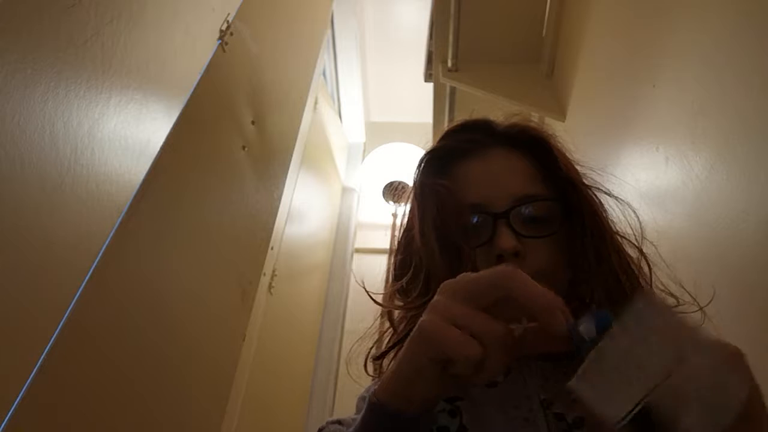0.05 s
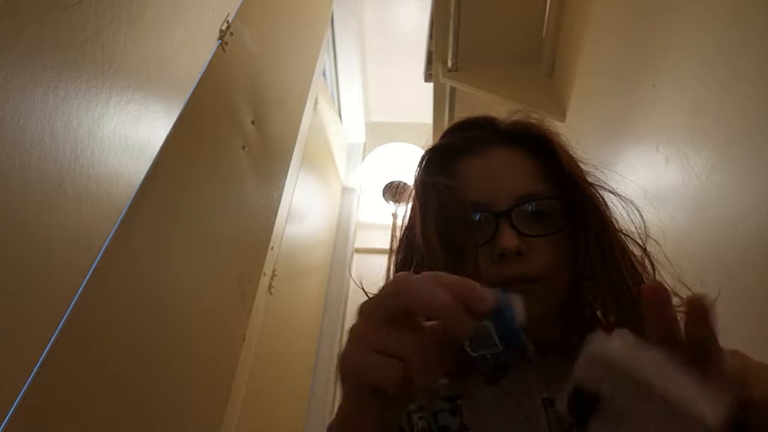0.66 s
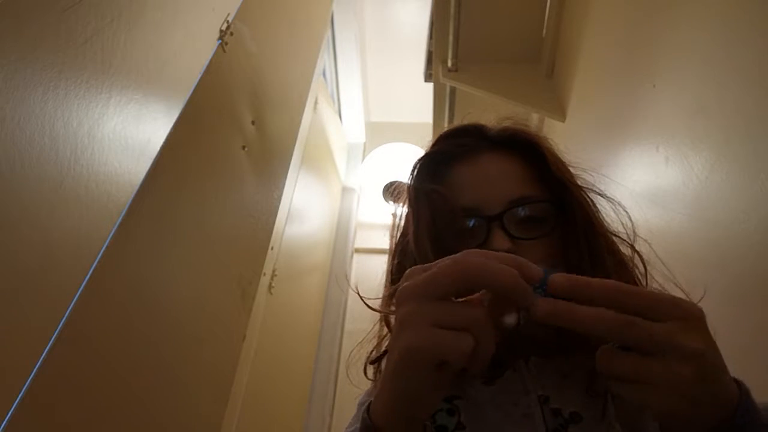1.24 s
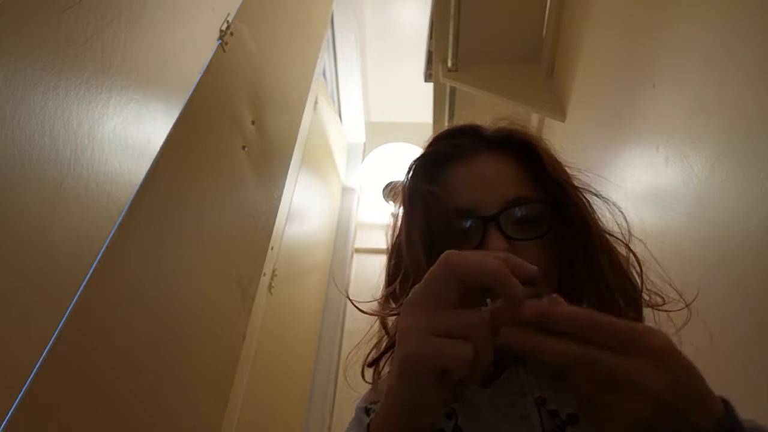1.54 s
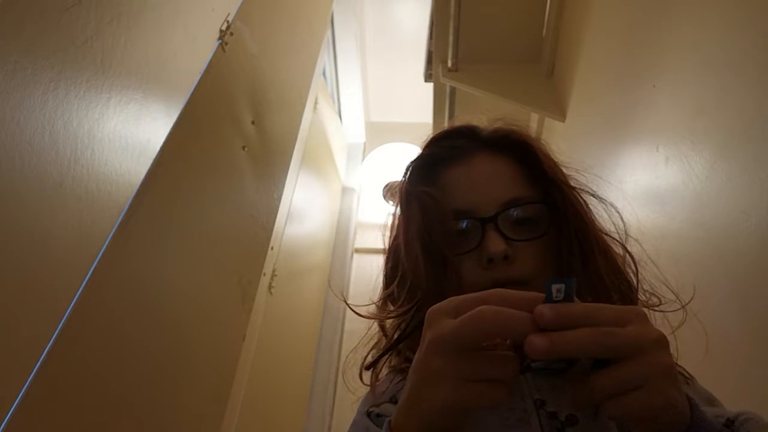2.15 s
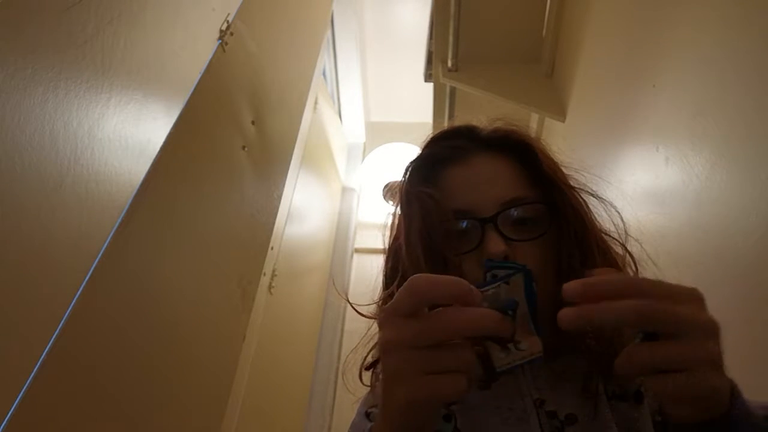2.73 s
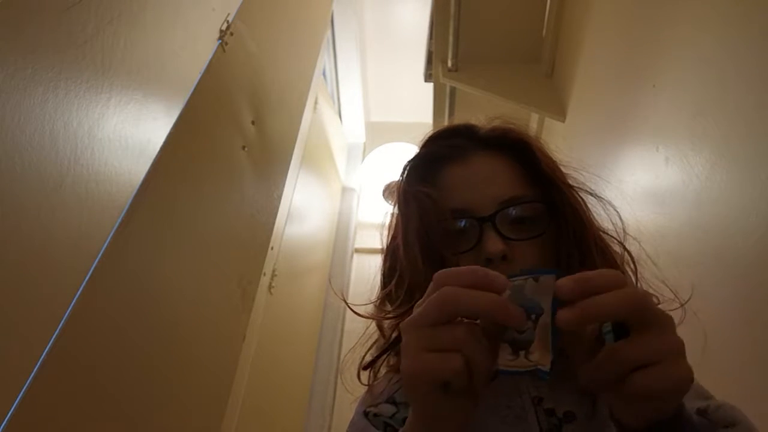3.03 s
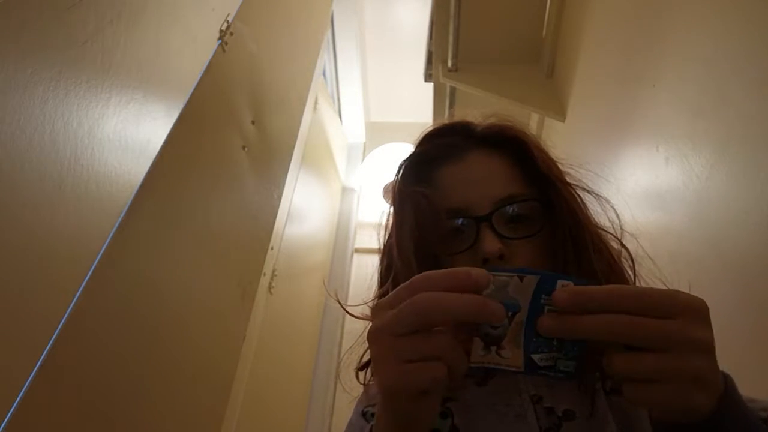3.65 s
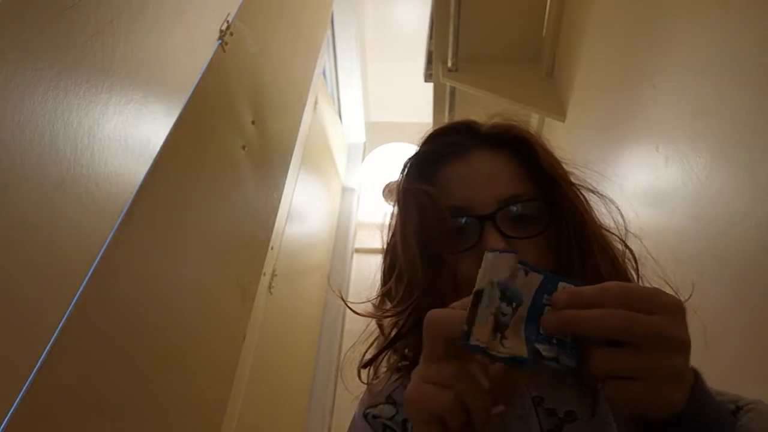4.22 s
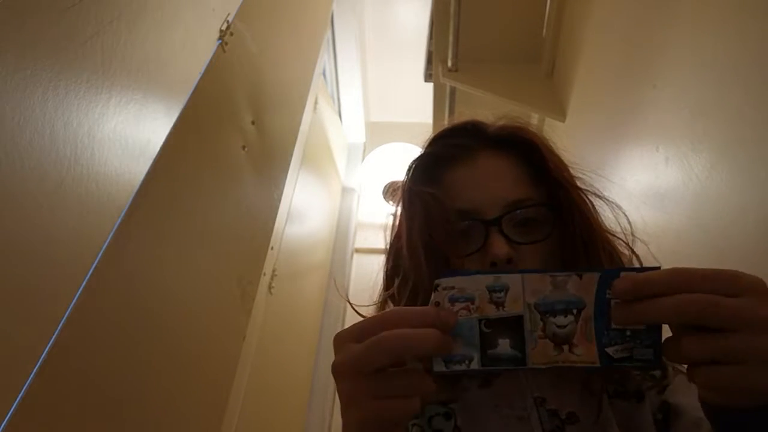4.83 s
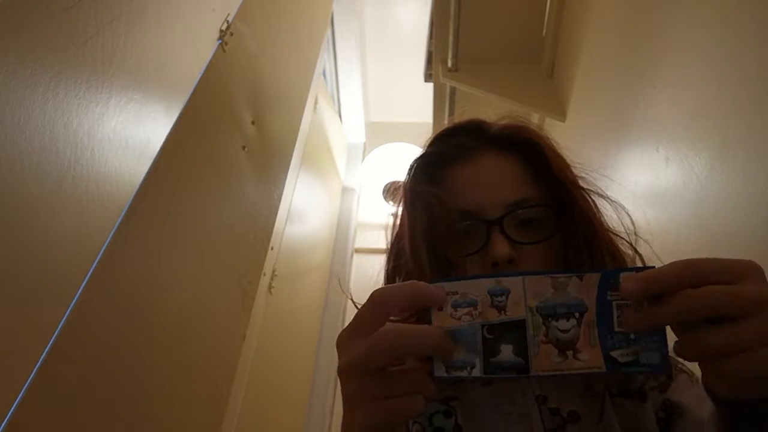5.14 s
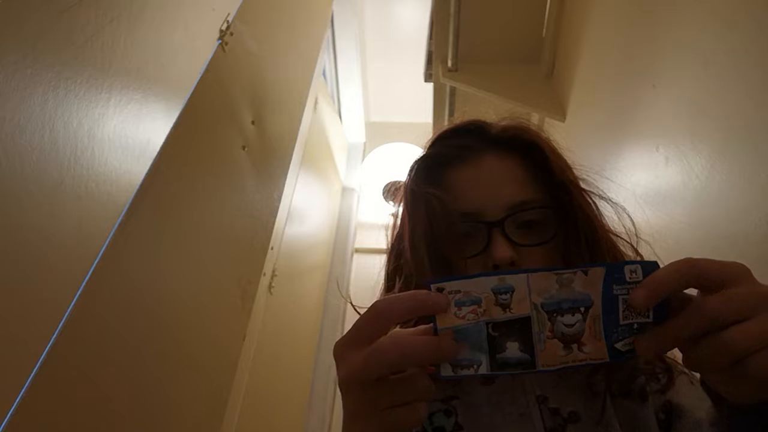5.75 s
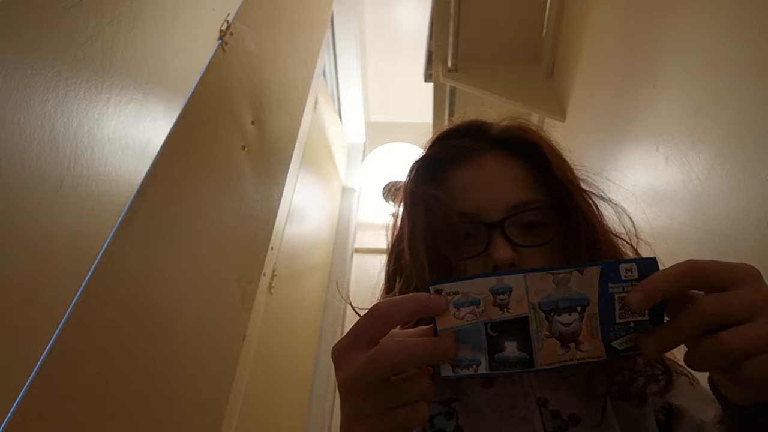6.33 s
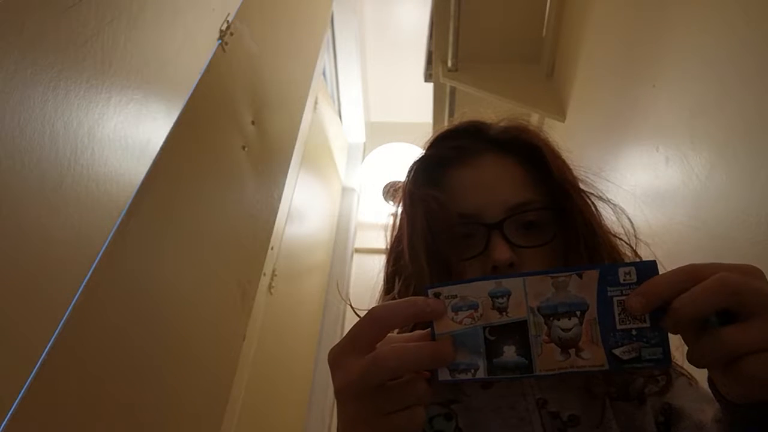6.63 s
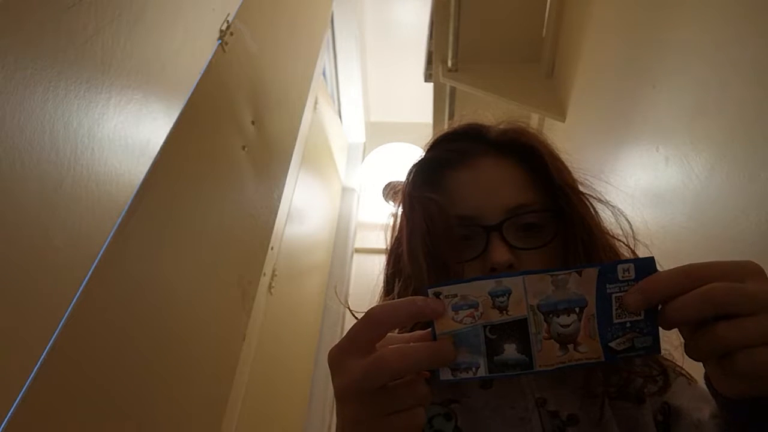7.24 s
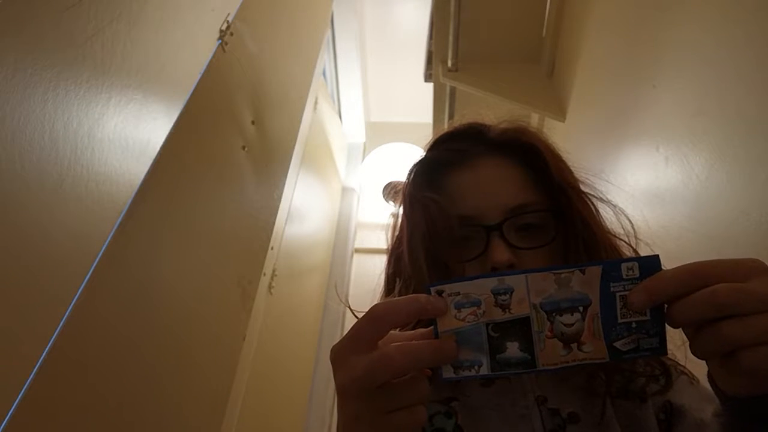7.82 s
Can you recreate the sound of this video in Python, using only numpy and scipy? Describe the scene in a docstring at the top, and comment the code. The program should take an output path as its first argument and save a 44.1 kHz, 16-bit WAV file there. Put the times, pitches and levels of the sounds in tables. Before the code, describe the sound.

A little paper leaflet is unfolded by hand, close up and fairly quietly. It rustles at first, then fingertips slide gently over it with occasional clicks from the creases. Midway comes a flurry of crackles, a quick judder and a sharp snap, with soft puffs of air. Afterwards the open sheet stirs only now and then. Bare hallway walls add a short echo over a faint wavering hum.

```python
"""Unfolding a paper leaflet

A small folded leaflet is picked out, pried open and pulled flat close to a microphone in a narrow
hallway. Creases buckle with sharp snaps, layers and fingertips slide with stick-slip friction, and
the opening sheet flaps, judders and fans the air. Bare walls reflect every snap; under it all lie
a low rumble, a faint hiss, a passing hum and a far whine."""
import sys
import numpy as np
from scipy import signal
from scipy.fft import rfft, irfft, next_fast_len
from scipy.io import wavfile
from scipy.ndimage import map_coordinates

SR = 44100
rng = np.random.default_rng(int(sys.argv[2]) if len(sys.argv) > 2 else 0)


def generate_wav(signal):
    """Clip the signal to [-1, 1] and save it as 16-bit WAV at the path in sys.argv[1]."""
    frames = np.transpose(np.atleast_2d(signal))
    scaled = np.clip(frames, -1, 1) * 32767
    pcm = np.round(scaled).astype(np.int16)
    wavfile.write(sys.argv[1], SR, pcm)


N = 351785

# buckling creases: t/s, level/dB, panel f/Hz, sharpness/dB, relative sheet flex/dB, panel T60/s
SNAPS = [(.0727, -31.5, 2850, -2, -19, .01), (.1615, -48.5, 2260, 2.5, -9, 0.011),
         (.3612, -66.5, 1980, -18, -14, .018), (.4866, -66, 2700, 10, -1, .02),
         (.6587, -47, 2100, -13, -4.5, .02), (.7366, -45, 2300, -0.5, -12, 0.0082),
         (.9674, -35, 2040, -8, -9, 0.022), (1.0097, -45, 1960, -22, -5, 0.041),
         (1.179, -39, 1970, -0.5, -5, .03), (1.953, -77, 2300, 6, -15, .01),
         (2.099, -42.5, 2207, -3, -28, 0.019), (2.317, -66.5, 2010, 9, -6, .012),
         (2.4442, -61.5, 1980, 7.5, -20, .01), (2.5633, -40.5, 2070, 2, -12, 0.01),
         (2.6607, -57.5, 1720, -7, 6, 0.0064), (3.1936, -53, 2170, -3, -4.5, 0.013),
         (3.3357, -51, 2000, -21.5, -8, .015), (3.3621, -47.5, 2310, -10, -5, 0.0066),
         (3.4586, -58, 2150, 4, -0.5, 0.017), (3.7258, -35, 2140, -10.5, -16, 0.011),
         (3.7897, -56, 2160, -5, -17, 0.014), (3.8317, -55.5, 2020, -7, -10, 0.014),
         (3.8733, -48, 2050, -6, -7, 0.018), (3.879, -53, 2180, 3, -20, .013),
         (3.918, -36.5, 2000, -3.5, -11, 0.014), (3.9504, -40, 2060, -6, -5, 0.01),
         (3.96, -35, 2210, 7.5, -16, 0.0048), (3.9844, -45, 2280, -9, -12, 0.0081),
         (4.03, -50.5, 2360, 6.5, -7, .012), (4.0751, -48, 2110, 4.5, -9, .011),
         (4.0904, -56, 2240, 7.5, -18, 0.013), (4.1336, -48, 1960, 0, -4.5, 0.021),
         (4.2072, -50, 2450, -1.5, -6, 0.011), (4.248, -55, 2390, -8, -25, .017),
         (4.356, -41.5, 2370, 0.5, -8.5, 0.0061), (4.3655, -51, 2280, -5, -3, .012),
         (4.3957, -43, 2310, 2, -22, .013), (4.4027, -40, 2030, 3, -3, 0.0038),
         (4.4182, -44, 2700, 5.5, -24, 0.0087), (4.4261, -37.5, 2600, 5, -6, 0.0037),
         (4.5991, -47, 2100, -18, 2.5, 0.012), (4.612, -37, 1940, -10, -4, 0.0097),
         (5.133, -57, 1780, 3, -1, 0.013), (5.1596, -32.5, 2400, -7, -35, 0.0085),
         (5.2039, -42.5, 2210, -2.5, -21, 0.0037), (5.3344, -60, 2460, 0.5, -9, 0.012),
         (5.3911, -62.5, 2120, 5, -25, 0.0095), (5.7846, -55, 2000, -6, -5.5, .012),
         (6.128, -69.5, 2200, -0.5, -6, 0.0092), (6.2958, -61, 2010, -5.5, -9, 0.0091),
         (6.4287, -61.5, 1840, -8, -2.5, 0.013), (6.5164, -68, 1690, -6, 6.5, 0.014),
         (6.6243, -52.5, 2340, -9, -4, 0.0042), (6.8, -68, 2200, -10, -5, .01),
         (7.136, -42, 2350, -30, -11, 0.0038), (7.2173, -47.5, 2070, -23, -5.5, 0.0073),
         (7.7428, -57.5, 2610, -22, 0.5, .02), (7.768, -64, 2360, 2, 6, 0.01)]
# bending modes of a panel: ratio to the panel frequency, relative level/dB
PANEL_MODES = [(.9, -14.5), (0.997, 2.5), (1.121, -3)]
# where the paper is held: t/s, left minus right level/dB
PAPER_PAN = [(0, -2.5), (1.1, -4), (2.1, -0.5), (3.3, 1), (3.72, -2), (4.4, -3.5), (4.6, -1.5), (7.98, 0)]
# strokes of paper on paper and skin: fastest at t/s, rise/s, fall/s, hiss level/dB, scrape level/dB
STROKES = [(0.094, 0.032, 0.078, -44.5, -44.5), (0.168, 0.022, .05, -50, -53),
           (.417, 0.027, 0.11, -57, -64.5), (.62, .1, 0.11, -44.5, -53.5), (.662, 0.056, 0.097, -62, -48.5),
           (0.769, 0.054, 0.041, -49, -55.5), (1.005, 0.066, 0.091, -56.5, -53.5),
           (1.124, 0.049, 0.081, -57.5, -76), (1.22, 0.075, 0.1, -58, -74),
           (1.655, 0.024, 0.079, -61.5, -62.5), (1.853, 0.044, .075, -50, -62.5),
           (2.12, 0.02, 0.1, -57.5, -72), (2.23, 0.092, 0.057, -54.5, -63.5), (2.41, .05, .05, -67, -72),
           (2.46, .02, .08, -60.5, -83), (2.585, .025, 0.2, -57.5, -59), (3.136, 0.027, 0.11, -54.5, -80),
           (3.205, 0.038, .12, -68, -61.5), (3.365, 0.056, 0.1, -60, -57.5), (3.49, 0.065, .12, -54, -57.5),
           (3.7, 0.6, .25, -92, -66.5), (3.97, 0.085, .13, -50, -55), (4.035, 0.076, 0.14, -62, -52),
           (4.14, 0.03, 0.073, -55.5, -59), (4.297, .06, .08, -51.5, -50.5), (4.4, 0.093, .07, -46, -47),
           (4.439, 0.069, 0.072, -54, -47), (4.644, 0.047, 0.072, -61.5, -48),
           (4.82, 0.096, 0.15, -69, -56), (4.98, 0.055, 0.081, -57.5, -60.5),
           (5.142, 0.029, 0.056, -48, -50.5), (5.197, .04, 0.07, -54.5, -48), (5.472, 0.057, .07, -61, -63),
           (6.0, 0.19, 0.32, -92, -70.5), (6.61, 0.19, 0.11, -73.5, -80), (7.78, 0.039, 0.083, -60, -60.5)]
# fingertips never quite at rest on the paper: t/s, hiss level/dB
GRIP = [(0, -68.5), (.3, -84.5), (1.1, -78), (1.6, -74), (1.97, -78), (2.4, -78), (2.95, -82), (3.8, -75),
        (5.1, -84), (5.6, -85), (7.98, -85.5)]
# spectra of the bright and the dull part of friction noise: f/Hz, relative level/dB
HISS_SPECTRUM = [(1800, -12), (3000, 2.5), (3700, 3), (4700, 1), (7000, 4.5), (8500, -1), (10500, 2.5),
                 (13000, -3.5), (15500, -13.5)]
SCRAPE_SPECTRUM = [(200, 1.5), (450, 3), (750, -6), (1250, -3.5), (1600, 0), (2100, 7), (2800, 5.5),
                   (4200, -29)]
# sheet flaps and finger bumps: t/s, thud level/dB, thud f/Hz, knock level/dB, knock f/Hz
FLAPS = [(.093, -51.5, 216, -60.5, 363), (.421, -60, 119, -57, 494), (.61, -56.5, 190, -51.5, 376),
         (.739, -51, 117, -49, 440), (.968, -48.5, 142, -48, 550), (.997, -55, 135, -53, 534),
         (2.597, -60.5, 140, -63, 650), (2.66, -49.5, 146, -54, 352), (3.361, -59, 207, -58, 480),
         (3.875, -47, 215, -57.5, 440), (3.92, -51.5, 206, -64, 355), (3.961, -52, 117, -54, 510),
         (3.994, -48, 122, -56.5, 680), (4.134, -42, 113, -56, 387), (4.356, -53, 156, -51.5, 400),
         (4.398, -45, 159, -47, 372), (4.425, -45.5, 103, -50.5, 560), (4.612, -53, 140, -63, 780),
         (5.158, -54.5, 113, -55, 473), (5.205, -50.5, 170, -48, 640), (5.335, -46.5, 110, -70, 370),
         (5.776, -42.5, 167, -49, 385), (6.298, -51.5, 82, -64.5, 396), (6.43, -48, 172, -66, 330),
         (6.517, -53, 229, -52.5, 328), (6.71, -56, 94, -82, 320), (7.207, -46.5, 153, -56, 362)]
# first and last jolt of the judder: snap level/dB, sharpness/dB, thud level/dB, thud f/Hz
FIRST_JOLT, LAST_JOLT = (-44.5, -15.5, -49, 199), (-58.5, -1.5, -44, 125)
# air stirred by the hands: t/s, level/dB
DRAUGHT = [(0, -48.5), (1.1, -49.5), (1.8, -54), (2.1, -51), (3.4, -54), (4.2, -50), (5.2, -46.5),
           (5.9, -51.5), (6.6, -56.5), (7.98, -58)]
# puffs fanned by the open sheet: t/s, level/dB
PUFFS = [(4.44, -38.5), (4.66, -51), (4.85, -42), (5.19, -34), (5.35, -43), (5.8, -41.5), (6.31, -42.5),
         (6.45, -44), (7.15, -41)]
# pressure spectrum of the moving air: f/Hz, relative level/dB
AIR_SPECTRUM = [(10, -2), (22, 5.5), (45, -5), (70, -4.5), (100, -21), (180, -30.5), (400, -71.5)]
# low resonances of the hallway: f/Hz, bandwidth/Hz, relative level/dB
ROOM_MODES = [(113.3, 18, 4), (182.6, 6.4, 2), (235, 13, 10), (342.2, 12.7, 9), (425.7, 13, 3)]
# reverberation time of the hallway: f/Hz, T60/s
REVERB_TIME = [(150, 0.34), (800, .32), (2100, 0.24), (5500, 0.22), (10000, 0.14), (15000, 0.26)]
# likeness of the echoes at the two microphone ports: f/Hz, correlation (0-1)
ECHO_CORRELATION = [(120, 1), (220, 0.91), (400, 0.47), (700, 0.01)]
# swells of a low hum: peak t/s, half length/s, f/Hz at the peak, sink rate/(Hz/s), level/dB
HUM_SWELLS = [(0, 0.22, 130, 25, -60.5), (.6, 0.17, 130, 20, -60), (2.82, 0.28, 215.7, 120, -67),
              (2.93, 0.14, 121, 50, -58), (4.1, 0.23, 124, 10, -57), (4.7, 0.13, 146, 10, -57),
              (6.22, 0.19, 172, 190, -67), (6.42, 0.22, 145, 20, -56.5), (6.847, 0.3, 133, 40, -64.5),
              (7.4, 0.18, 187, 55, -64)]
# swells of a far whine: peak t/s, level/dB
WHINE_SWELLS = [(4.92, -75.5), (5.9, -84), (7.66, -83)]
# course of the rumble of the house: t/s, level/dB
RUMBLE_LEVEL = [(0, -68.5), (1, -67), (1.9, -71.5), (2.5, -71.5), (3, -64), (3.6, -67), (5.5, -64.5),
                (7.2, -67), (7.98, -67.5)]
# spectra of the rumble and of the even background hiss: f/Hz, relative level/dB
RUMBLE_SPECTRUM = [(30, -7), (70, 2), (120, 5.5), (180, -2), (260, -8.5), (430, -14.5), (600, -73),
                   (1000, -72)]
QUIET_SPECTRUM = [(300, 11), (600, 1.5), (1200, -2.5), (2100, 3), (3500, -1), (6000, -7), (9000, -21),
                  (15000, -10.5)]
# frequency response of the microphone ports: f/Hz, gain/dB
PORT_RESPONSE = [(600, -1), (900, 1), (1220, 4.5), (1550, 4.5), (2000, 0), (3300, -2.5), (3900, -2.5),
                 (4650, -0.5), (5600, -1), (8300, 1), (9600, 0.5), (13000, -2.5)]


def snaps(rows, buckle_s=0.0013, sheet_hz=1210, sheet_t60=0.012, middling_db=-48.5):
    """Snap-through buckling: fibres crack, the stiff panel beside the crease rings, the sheet flexes."""
    track, t = np.zeros((2, N)), np.arange(SR // 30) / SR
    # the crease lets go with a tick, then the kink runs along it and dies out
    buckle = amp(-3) * np.exp(-t / 0.00019) + t / buckle_s * np.exp(-t / buckle_s)

    def fibres(correlation):
        """Fibre fracture radiates a few milliseconds of noise."""
        return noise_pair(len(t), correlation) * buckle

    def mode(hz, t60):
        """A damped mode reaches each port at its own phase."""
        phase = rng.normal(0, 0.61, (2, 1))
        onset = 1 - np.exp(-t / 0.00085)
        return np.sin(2 * np.pi * hz * t + phase) * amp(-60 * t / t60) * onset

    for s, db, hz, sharp_db, flex_db, t60 in rows:
        ring = sum(amp(level) * mode(hz * ratio, t60) for ratio, level in PANEL_MODES)
        body = band(fibres(0.36), 0.68 * hz, 1.515 * hz)
        flex = mode(sheet_hz, sheet_t60)
        skirt = band(fibres(0.055), 235, 1400)
        crack = band(fibres(0.024), 3050, 6380, order=3)
        fizz = band(fibres(0.029), 4760, 12000, order=3)
        # a sharp snap fizzes more, a big slow one less
        fizz_db = -4 + 1.05 * sharp_db - 0.12 * (db - middling_db)
        parts = [(ring, 0), (body, -5), (flex, flex_db - 3),
                 (skirt, -19), (crack, sharp_db), (fizz, fizz_db)]
        snap = sum(amp(db + part_db) * burst(x, 0.0033) for x, part_db in parts)
        pan_db = np.interp(s, *np.transpose(PAPER_PAN))
        add(track, s, hallway(panned(snap, pan_db), wet_db=-4))
    return track


def crinkles(scrape, count=200, max_per_s=20, threshold_db=-68, panel_hz=2310, flex_db=-10, t60=0.017):
    """Buckling threshold: rows of small snaps, at random wherever the paper slides hard enough."""
    when, lottery = rng.random((count, 2)).T
    size, pitch, sharpness = rng.standard_normal((count, 3)).T
    at = (when * N).astype(int)
    stroke_db = 20 * np.log10(scrape[at])
    level_db = stroke_db - 7.5 + 2.5 * size
    hz = panel_hz * np.exp(0.09 * pitch)
    sharp_db = 2 + 2.5 * sharpness
    gives_way = (lottery * count < max_per_s * N / SR) & (stroke_db > threshold_db)
    return [(at[i] / SR, level_db[i], hz[i], sharp_db[i], flex_db, t60)
            for i in np.flatnonzero(gives_way)]


def sliding(speed_exponent=1.85, grip_scrape_db=2):
    """Power law of friction noise: hiss and scrape amplitudes grow about as sliding speed squared."""
    power = (amp([[0], [grip_scrape_db]]) * amp(over_time(GRIP))) ** 2
    for s, rise_s, fall_s, hiss_db, scrape_db in STROKES:
        t = np.arange(0, rise_s + fall_s, 1 / SR)
        speed = np.interp(t, [0, rise_s, rise_s + fall_s], [0, 1, 0])
        add(power, s - rise_s, (amp([[hiss_db], [scrape_db]]) * speed ** speed_exponent) ** 2)
    return np.sqrt(power)


def rubbing(hiss, scrape, catches_per_s=900, release_s=0.00098):
    """Stick-slip friction: fibres catch and let go, roughening the noise of sliding paper."""
    catches = (rng.random(N) < catches_per_s / SR) * amp(5.7 * np.clip(rng.standard_normal(N), -2, 2))
    grain = unit(signal.lfilter([1], [1, -np.exp(-1 / (release_s * SR))], catches))
    friction = (1 + 0.55 * grain) * amp(wobble(70))
    direct = amp(-1) * hiss * coloured(friction * noise_pair(N, 0.08), HISS_SPECTRUM)
    direct += amp(-2) * scrape * coloured(friction * noise_pair(N, 0.2), SCRAPE_SPECTRUM)
    return hallway(panned(direct, -0.59), wet_db=-8)[:, :N]


def flaps(rows, thud_t60=0.045, knock_t60=0.021):
    """Impulsive excitation: the sheet swings in one soft push, which drives the low room modes."""
    track, t = np.zeros((2, N)), np.arange(SR // 8) / SR
    for s, thud_db, thud_hz, knock_db, knock_hz in rows:
        push = noise_pair(len(t), 0.99) * amp(-60 * t / thud_t60)
        slap = noise_pair(len(t), 0.5) * amp(-60 * t / knock_t60)
        thud = burst(band(push, thud_hz / 1.64, thud_hz * 1.267), 0.02)
        knock = burst(band(slap, knock_hz / 1.39, knock_hz * 1.235), 0.01)
        add(track, s, hallway(amp(thud_db) * thud + amp(knock_db) * knock, wet_db=-5.5))
    return filtered(track, room_resonance)


def judder(start_s=4.7734, count=9, first_gap_s=0.016, settled_gap_s=0.0302,
           panel_hz=2420, flex_db=-6, t60=0.0073, knock_db=-55, knock_hz=400):
    """Relaxation to a steady beat: snap and flap rows for the slowing jolts of the sheet pulled flat."""
    gaps = settled_gap_s + (first_gap_s - settled_gap_s) * 0.5 ** np.arange(count - 1)
    times = start_s + np.append(0, np.cumsum(gaps))
    snap_rows, flap_rows = [], []
    for s, (db, sharp_db, thud_db, thud_hz) in zip(times, np.linspace(FIRST_JOLT, LAST_JOLT, count)):
        snap_rows.append((s, db, panel_hz, sharp_db, flex_db, t60))
        flap_rows.append((s, thud_db, thud_hz, knock_db, knock_hz))
    return snap_rows, flap_rows


def waft(rise_s=0.078, fall_s=0.12):
    """Air displacement: the draught of the hands and puffs from the sheet press on both ports alike."""
    puff_power = sum((amp(db) * swell(s, rise_s, fall_s)) ** 2 for s, db in PUFFS)
    power = amp(over_time(DRAUGHT)) ** 2 + puff_power
    return amp(-1) * np.sqrt(power) * coloured(noise_pair(N, 1), AIR_SPECTRUM)


def hallway(x, wet_db, first_echo_s=0.0019):
    """Reverberation: bare walls add a tail whose treble dies first; long waves reach both ports alike."""
    hz, t, noise = signal.stft(rng.standard_normal((3, SR // 4)), SR, nperseg=512)
    shared = np.clip(over_frequency(ECHO_CORRELATION, hz), 0, 1)[:, None]
    field = np.sqrt(shared) * noise[0] + np.sqrt(1 - shared) * noise[1:]
    decay = amp(-60 * t / over_frequency(REVERB_TIME, hz)[:, None])
    tail = signal.istft(field * decay, SR, nperseg=512)[1]
    tail *= np.clip(np.arange(tail.shape[1]) / SR / first_echo_s - 1, 0, 1)
    response = amp(wet_db) * tail / np.linalg.norm(tail[0])
    response[:, 0] += 1  # direct path
    return signal.fftconvolve(x, response, axes=1)


def room_resonance(hz):
    """Modal superposition: second-order resonances of the hallway add to a flat direct path."""
    modes = sum(amp(db) * 1j * hz * width / (centre ** 2 - hz ** 2 + 1j * hz * width)
                for centre, width, db in ROOM_MODES)
    return 0.55 + amp(-2) * modes


def hum():
    """Frequency glide: a faint, wavering low tone sinks in pitch during each swell."""
    t, waver = np.arange(N) / SR, 1 + 0.02 * wobble(25)
    tone = np.zeros(N)
    for s, half_s, hz, sink_rate, db in HUM_SWELLS:
        pitch_hz = (hz - sink_rate * (t - s)) * waver
        tone += amp(db) * swell(s, half_s, half_s) * np.sin(2 * np.pi * np.cumsum(pitch_hz) / SR)
    return np.sqrt(2) * amp(-1 + 4.2 * wobble(14)) * tone


def whine(centre_hz=790, half_s=0.26):
    """Random modulation: a thin tone far off in the house wavers in pitch and level."""
    envelope = sum(amp(db) * np.sqrt(swell(s, half_s, half_s)) for s, db in WHINE_SWELLS)
    pitch_hz = centre_hz * (1 + 0.0206 * wobble(60))
    tone = unit(np.sin(2 * np.pi * np.cumsum(pitch_hz) / SR))
    return envelope * tone * amp(1.5 * wobble(14))


def background(quiet_db=-72):
    """Ambient noise: the fluctuating low rumble of the house and an even hiss."""
    rumble_db = over_time(RUMBLE_LEVEL) + 4.2 * wobble(2.877)
    rumble = amp(rumble_db) * coloured(noise_pair(N, 1), RUMBLE_SPECTRUM)
    return rumble + amp(quiet_db) * coloured(noise_pair(N, 0.093), QUIET_SPECTRUM)


def amp(db):
    """Decibels to amplitude ratio."""
    return 10 ** (np.asarray(db) / 20)


def unit(x):
    """Normalisation to rms 1."""
    return x / np.sqrt(np.mean(x ** 2) + 1e-20)


def over_frequency(points, hz):
    """Interpolation of (f/Hz, value) points on a logarithmic axis."""
    f, values = np.transpose(points)
    return np.interp(np.log(hz + 1), np.log(f + 1), values)


def over_time(points):
    """Linear interpolation of (t/s, value) points at every sample."""
    return np.interp(np.arange(N) / SR, *np.transpose(points))


def swell(s, rise_s, fall_s):
    """Triangular envelope reaching 1 at time s."""
    return over_time([(s - rise_s, 0), (s, 1), (s + fall_s, 0)])


def wobble(knots_per_s):
    """Slow fluctuation: a spline through random knots."""
    knots = rng.standard_normal(int(N * knots_per_s / SR) + 4)
    return np.repeat(map_coordinates(knots, [np.arange(0, N, 4) * knots_per_s / SR]), 4)[:N]


def filtered(x, response):
    """Linear filtering: the spectrum of x times a frequency response."""
    size = next_fast_len(N + SR // 2)
    return irfft(rfft(x, size) * response(np.fft.rfftfreq(size, 1 / SR)), size)[..., :N]


def coloured(x, spectrum):
    """Spectral shaping of x, at rms 1."""
    return unit(filtered(x, lambda hz: amp(over_frequency(spectrum, hz))))


def band(x, lo_hz, hi_hz, order=2):
    """Causal band-pass filtering."""
    return signal.lfilter(*signal.butter(order, [lo_hz, hi_hz], 'band', fs=SR), x)


def noise_pair(size, correlation):
    """Partial coherence: left and right noise with a shared part."""
    noise = rng.standard_normal((3, size))
    return np.sqrt(correlation) * noise[0] + np.sqrt(1 - correlation) * noise[1:]


def panned(x, pan_db):
    """Level difference: the left channel gains pan_db over the right."""
    return x * unit(amp([[pan_db / 2], [-pan_db / 2]]))


def burst(x, span_s):
    """Energy normalisation: each channel carries as much as span_s seconds at rms 1."""
    return x * np.sqrt(span_s * SR / np.sum(x ** 2, axis=-1, keepdims=True))


def add(track, s, x):
    """Superposition of x on the track from time s."""
    start = max(round(s * SR), 0)
    track[:, start:start + x.shape[1]] += x[:, :max(N - start, 0)]


def scene():
    """Superposition: the leaflet in the hands, over the quiet of the house."""
    hiss, scrape = sliding()
    jolt_snaps, jolt_flaps = judder()
    house = background() + hum() + whine()
    handling = waft() + rubbing(hiss, scrape) + flaps(FLAPS + jolt_flaps)
    return house + handling + snaps(SNAPS + jolt_snaps) + snaps(crinkles(scrape))


def record(dry, top_hz=15830):
    """Band-limited response: the microphone ports colour the sound, and nothing passes above top_hz."""
    return filtered(dry, lambda hz: amp(over_frequency(PORT_RESPONSE, hz)) * (hz < top_hz))


dry = scene()
out = record(dry)
generate_wav(out)
```